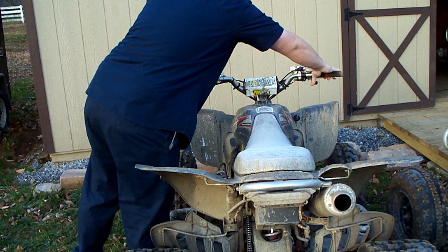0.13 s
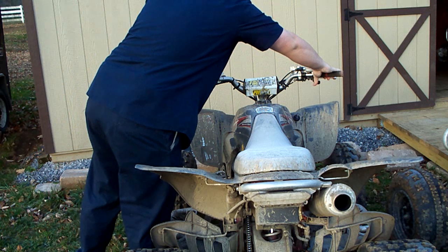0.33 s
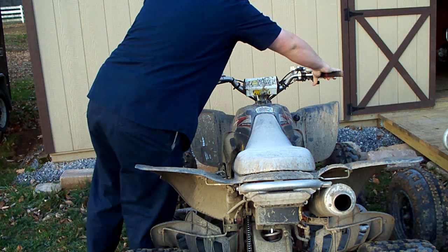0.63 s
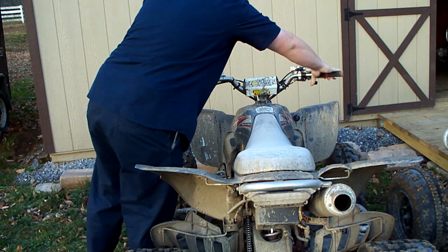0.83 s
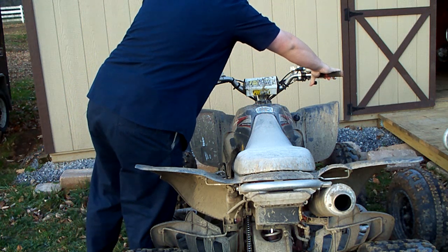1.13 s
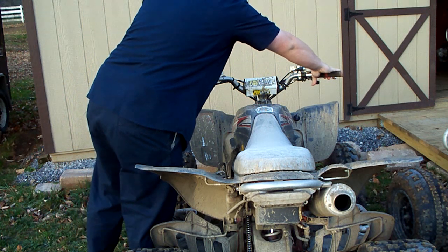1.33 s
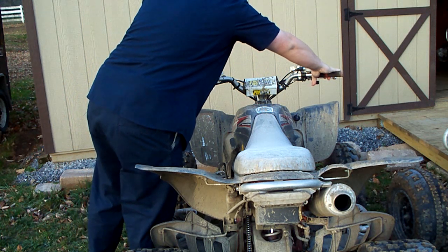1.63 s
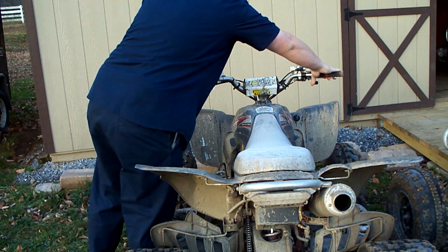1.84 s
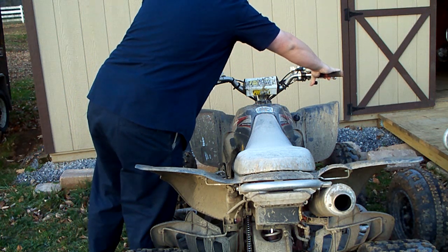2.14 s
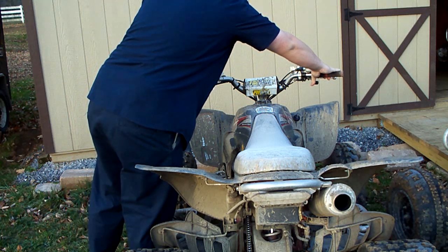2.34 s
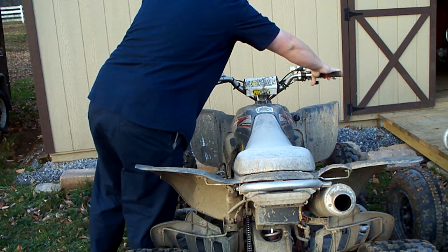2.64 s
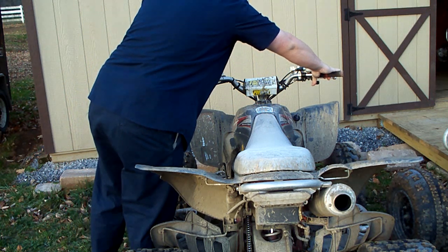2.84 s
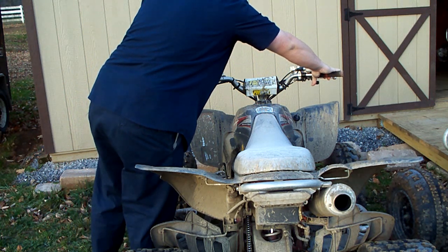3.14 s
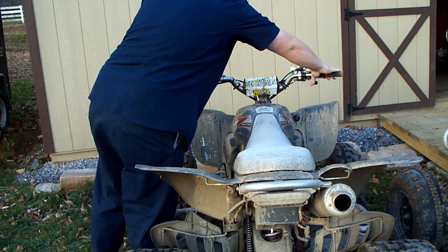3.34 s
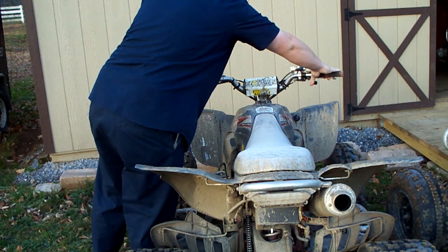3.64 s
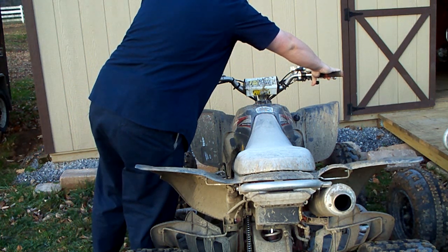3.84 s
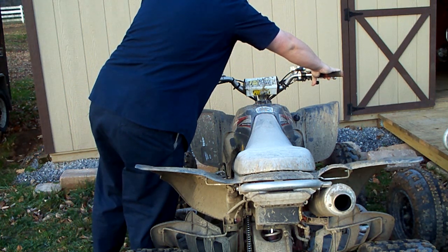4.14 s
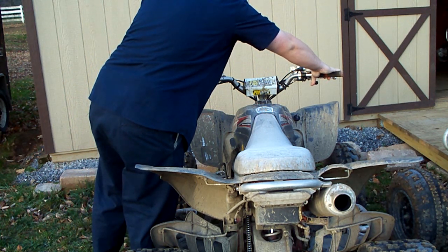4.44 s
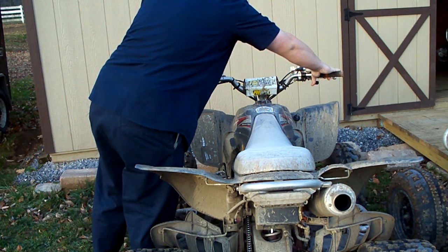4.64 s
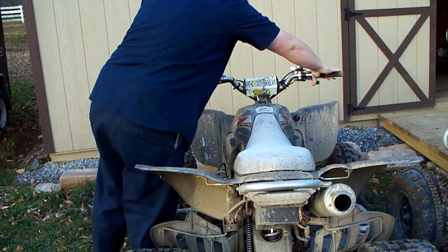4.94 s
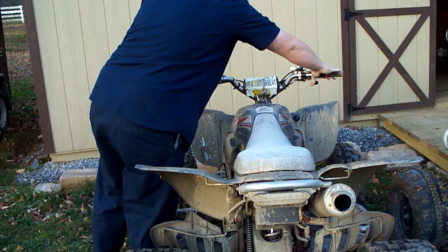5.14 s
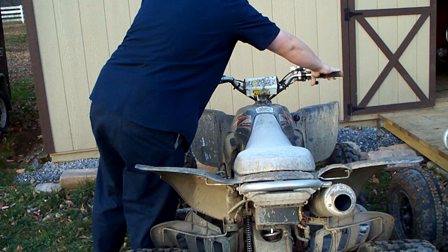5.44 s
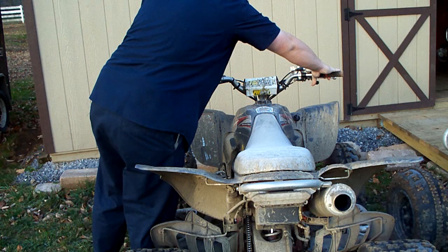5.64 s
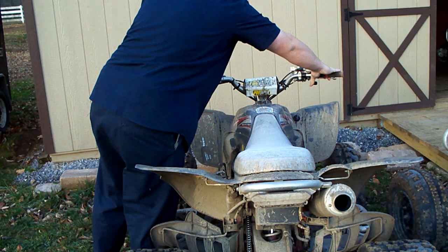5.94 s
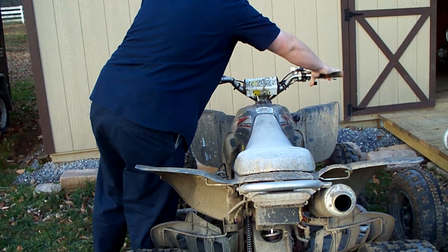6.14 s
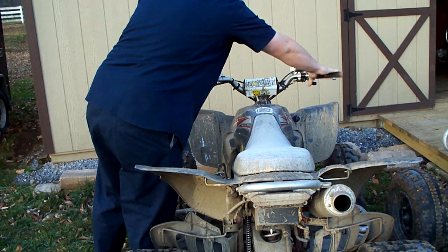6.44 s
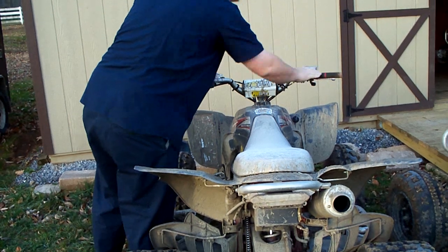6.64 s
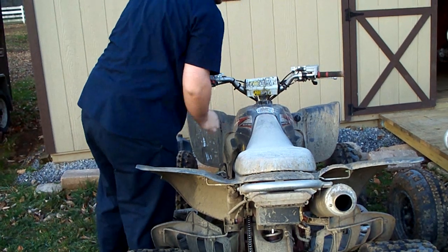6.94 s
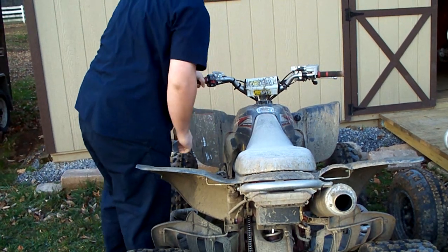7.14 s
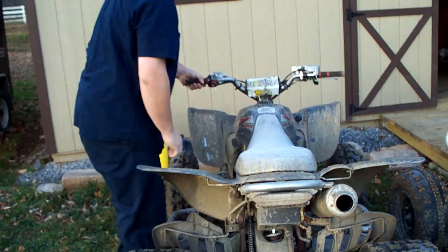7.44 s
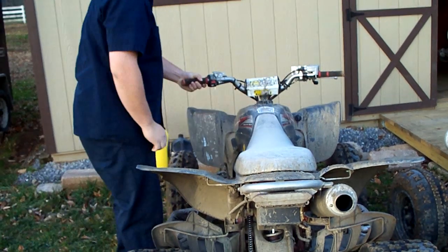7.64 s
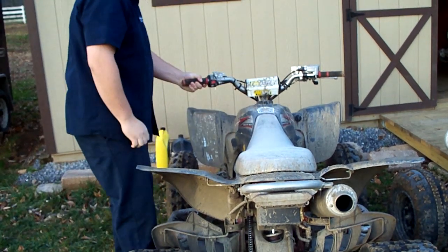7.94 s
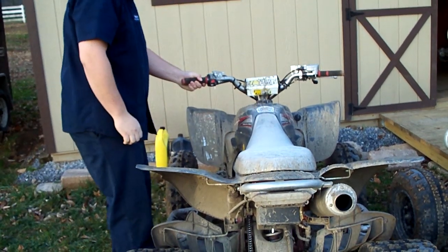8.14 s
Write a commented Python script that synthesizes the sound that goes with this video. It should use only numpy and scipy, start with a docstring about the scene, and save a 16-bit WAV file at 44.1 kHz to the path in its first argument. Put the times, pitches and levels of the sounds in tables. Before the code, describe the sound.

Outdoors, a single-cylinder engine cranks haltingly with gear whine and isolated exhaust thumps, bursts into loud barking bangs, and settles to a fast thudding idle.

```python
"""A single-cylinder quad bike engine, tailpipe to the microphone: stray firings, a two-part backfire, three
hard rasping bangs, then a thudding cold idle of about 17 firings a second; firings ring the pipe modes.
The starter's gear noise and tooth tones whine and rattle in surges and break off at stray firings.
Unfired charges puff and hum; the clutch chirps while starting, the idle's treble swells; chain and valves clatter.
A yard with a wooden shed adds three reflections and a faint scatter to the tailpipe."""
import sys
import numpy as np
from scipy import signal
from scipy.fft import rfft, irfft, next_fast_len
from scipy.io import wavfile
from scipy.ndimage import uniform_filter1d, map_coordinates

SR = 44100
rng = np.random.default_rng(int(sys.argv[2]) if len(sys.argv) > 2 else 0)


def output_pcm(signal):
    """Save a mono or channel-first signal as 16-bit PCM at the path in sys.argv[1].

    Samples are clipped to [-1, 1] before scaling.
    """
    pcm = np.clip(np.atleast_2d(signal).T, -1, 1) * 32767
    wavfile.write(sys.argv[1], SR, np.round(pcm).astype(np.int16))


N = 365588
TIME = np.arange(N) / SR
CUTOFF_HZ = 10000

# Stray firings and bangs of catching: (time [s], level [dB], bark of upper pipe modes [dB])
BANGS = [(0.325, -6.5, -3), (2.312, -2.5, 0.5), (3.552, -9.5, 9), (4.3646, -8.5, -7), (4.737, -4.5, -6),
         (4.8543, -5.5, -4.5), (5.4739, -7, -7), (5.6191, -4.5, -5), (5.7292, -1.5, 6.5), (5.7864, 3.5, 8),
         (5.8246, 2, 6), (5.8596, 3, 8), (5.8946, -3, 1), (5.9322, 1, 5.5), (5.978, -9.5, 3),
         (6.0214, 1, 6), (6.0758, -4.5, -4)]
# Hunting of the cold idle: (time [s], rate [firings/s])
IDLE_SPEED = [(6.169, 17.38), (6.294, 13.98), (6.359, 17.1), (6.78, 16.16), (6.957, 17.76), (7.015, 17.01),
              (7.126, 19.06), (7.184, 15.67), (7.242, 17.87), (7.467, 17.97), (7.526, 15.59), (7.584, 18.3),
              (7.7, 16.46), (7.819, 16.97), (7.88, 16.21), (7.999, 17.32), (8.059, 16.06), (8.12, 16.77)]
IDLE_FROM_S = 6.139
IDLE_DB, IDLE_SPREAD_DB = -1.74, 0.22
IDLE_BARK_DB, BARK_RANGE_DB, BARK_AT_HZ, BARK_SPREAD_DB = 0.8, 3.3, .6, 1.5


def engine_firings():
    """Bangs, then one firing per idle cycle, as (s, dB, bark dB); early burns bark, late ones are dull."""
    running = TIME >= IDLE_FROM_S
    cycles = np.cumsum(in_time(IDLE_SPEED)[running]) / SR
    start_s = np.interp(np.arange(cycles[-1]), cycles, TIME[running])
    rate_hz = 1 / np.diff(start_s, prepend=BANGS[-1][0])
    chance = rng.standard_normal((len(start_s), 2))
    ahead_hz = rate_hz - uniform_filter1d(rate_hz, size=5)
    level_db = IDLE_DB + IDLE_SPREAD_DB * chance[:, 0]
    bark_db = IDLE_BARK_DB + BARK_RANGE_DB * np.tanh(ahead_hz / BARK_AT_HZ) + BARK_SPREAD_DB * chance[:, 1]
    return np.vstack([BANGS, np.transpose([start_s, level_db, bark_db])])


# Modes of the hot exhaust pipe and silencer: (frequency [Hz], signed strength [ratio], t60 [s])
PIPE = [(65.7, 0.0264, 0.17), (131, -0.088, 0.055), (282.2, -0.55, 0.032), (404.5, 0.57, 0.023),
        (760, 0.1, .02), (917, 0.21, 0.016), (1070, 0.19, 0.0073)]


def pipe(start_s, level_db, bark_db, tuning, sustain):
    """Each blow rings all pipe modes; bark raises those above 600 Hz."""
    chance = rng.standard_normal((len(start_s), len(PIPE)))
    out = 0
    for k, (hz, strength, t60_s) in enumerate(PIPE):
        upper = hz > 600
        blow = clicks(start_s, from_db(level_db + upper * bark_db + .5 * chance[:, k]))
        out = out + strength * ring(blow, hz * tuning, t60_s * sustain)
    return out


# Spectrum of the rumble after lone firings: (frequency [Hz], density [dB per Hz])
RUMBLE_COLOUR = [(60, 0.5), (170, -2), (320, 2), (600, -9), (820, -12), (1300, -28), (4000, -39)]


def exhaust(firings):
    """Lone firings meet cold gas, so the pipe rings lower; the slow piston pushes a second puff after."""
    start_s, level_db, bark_db = np.transpose(firings)
    lone = np.diff(start_s, prepend=-1) > .112   # gap [s]
    hot = pipe(start_s[~lone], level_db[~lone], bark_db[~lone], tuning=1, sustain=1)
    cold = pipe(start_s[lone], level_db[lone], bark_db[lone], tuning=0.892, sustain=0.72)
    delay_s = 0.01693 + 0.0013 * rng.standard_normal(lone.sum())
    second = clicks(start_s[lone] + delay_s, from_db(level_db[lone]))
    after = 0.19 * ring(second, hz=272.0, t60_s=0.058)
    after = after - 0.12 * ring(second, hz=435, t60_s=0.026)
    after = after + 0.017 * ring(second, hz=62.4, t60_s=0.6)
    rumble = from_db(-30.5) * fade(second, decay_s=0.069) * noise(RUMBLE_COLOUR) * from_db(3 * drift(70))
    return soften(hot + cold + after, peak_s=0.00059, width_s=0.00022) + rumble


# Spectrum of the trailing gas: (frequency [Hz], density [dB per Hz])
GAS_COLOUR = [(100, -7), (330, 12.5), (560, 7.5), (800, 0), (1300, -2.5), (2000, -4), (3200, -21.5),
              (5000, -17), (7000, -8.5), (9300, -28.5)]


def gas(firings):
    """Turbulent gas: a spit as the valve opens, then a rush that trails each firing."""
    start_s, level_db, bark_db = np.transpose(firings)
    strength = from_db(level_db + 0.44 * bark_db + rng.normal(0, 1, len(start_s)))
    rush_env = fade(clicks(start_s + .004, strength), decay_s=0.019)
    rush = from_db(-28.5) * rush_env * noise(GAS_COLOUR) * from_db(2 * drift(300))
    spit_env = fade(clicks(start_s + 0.00075, strength), decay_s=0.0015)
    return rush + from_db(-29) * spit_env * noise(RATTLE)


# A two-part backfire, then the rasp of the three hard bangs: (time [s], level [dB], length [s])
NOISE_BURSTS = [(3.624, -20, 0.0079), (3.642, -21.5, 0.017), (5.787, -17, 0.0064), (5.825, -14, 0.0076),
                (5.861, -17.5, 0.0047)]
# Spectrum of these bursts: (frequency [Hz], density [dB per Hz])
BURST_COLOUR = [(100, -12), (400, 1), (800, -3.5), (1300, -3.5), (2000, -4), (3200, -15), (5000, -17),
                (7000, -9.5), (9300, -27.5)]


def backfire_and_rasp():
    """Turbulent noise bursts with a ragged level: a two-part backfire, then the rasp of the three hard bangs."""
    ragged = from_db(2 * drift(500))
    return swells(NOISE_BURSTS, attack_s=0.0014, release_s=0.012) * noise(BURST_COLOUR) * ragged


# Unfired charges leaving the pipe: (time [s], relative level [dB])
PUFFS = [(.003, -38.5), (0.536, -42.5), (0.902, -45), (1.263, -42.5), (1.625, -36), (1.989, -36),
         (2.875, -44.5), (3.235, -46), (3.664, -37), (4.05, -48.5), (4.95, -46), (5.179, -54)]
HUM_START_HZ, HUM_RISE_HZ_PER_S, HUM_TOP_HZ = 45.8, 200, 78   # before a slight wander


def puffs():
    """An unfired charge thumps; the pipe hums while the valve is open, climbing as the piston rises."""
    start_s, level_db = np.transpose(PUFFS)
    push = soften(clicks(start_s, from_db(level_db)), peak_s=.002, width_s=0.00023)
    valve_open = swells([(s, db, .11) for s, db in PUFFS], attack_s=.008, release_s=0.017)
    latest = np.maximum(np.searchsorted(start_s, TIME) - 1, 0)
    age_s = np.maximum(TIME - start_s[latest], 0)
    hz = np.minimum(HUM_START_HZ + HUM_RISE_HZ_PER_S * age_s, HUM_TOP_HZ) + 2 * drift(22)
    hum = valve_open * np.sin(2 * np.pi * np.cumsum(hz) / SR)
    return from_db(-7) * hum - from_db(9) * ring(push, hz=104, t60_s=0.077)


# Starter speed between compressions: (time [s], tooth rate [Hz])
MESH = [(0, 1191), (.6, 1201), (2.2, 1199), (2.7, 1199), (3.4, 1205), (4.2, 1224), (4.95, 1247),
        (5.8, 1223)]
# Starter labouring through heavy piston strokes: (time [s], length [s], level [dB])
STROKES = [(0.11, 0.094, -17.5), (0.229, 0.077, -18.5), (0.773, 0.067, -25.5), (1.135, 0.073, -26),
           (1.497, 0.068, -17.5), (1.859, 0.071, -17.5), (2.1, 0.093, -17), (2.23, 0.07, -18.5),
           (2.748, 0.055, -25), (3.104, 0.069, -26), (3.47, 0.074, -17), (3.933, 0.059, -28),
           (4.284, .064, -29), (4.667, 0.066, -27.5), (5.392, 0.063, -27.3)]
SAG_HZ = 180.6   # fall of tooth rate at the top of a stroke


def tooth_rate():
    """The starter races briefly as a heavy stroke begins, sags at its top and recovers."""
    hz = in_time(MESH)
    for start_s, length_s, _ in STROKES:
        top_s = start_s + length_s
        near = np.abs(TIME - top_s) < .2
        age_s = TIME[near] - top_s
        race = 0.36 * np.exp(-.5 * ((age_s + 0.0627) / 0.018) ** 2)
        sag = np.exp(-.5 * (age_s / np.where(age_s < 0, .024, .034)) ** 2)
        hz[near] += SAG_HZ * (race - sag)
    return hz


# Bite, then full push of a stroke: (start [share of stroke], level [dB re stroke], length [share of stroke])
STROKE_SHAPE = [(0, -1, 0.38), (.43, 0.5, 0.44)]
# Slack taken up, gears bouncing: (time [s], length [s], level [dB], rise over length [dB], bounce period [s])
TAKEUPS = [(0, 0.11, -24, 5, .056), (0.452, 0.27, -28, 0.5, .051), (0.861, 0.23, -27.5, 1, .0505),
           (1.222, .24, -28, 7.5, .051), (1.585, 0.23, -22, 4.5, .0505), (1.949, 0.15, -21.5, 0.5, .05),
           (2.428, 0.032, -34.5, 0, .051), (2.554, 0.024, -27.5, 0, .051), (2.619, 0.071, -31.5, 11, .036),
           (2.837, .23, -30.5, 1.7, .023), (3.196, 0.25, -32.5, 10.3, .023), (3.838, 0.032, -32, 0, .051),
           (4.016, 0.21, -33.5, 2.5, .052), (4.473, 0.008, -27.5, 0, .051), (4.831, 0.0088, -38, 0, .051),
           (4.943, 0.093, -39, 3, .023), (5.155, 0.011, -27, 1, .051), (5.221, .1, -35, 11, .023),
           (5.584, 0.009, -25, -3, .051), (5.703, 0.02, -29.5, 0, .051)]
BOUNCE_CONTACT, FIRST_BOUNCE_DB = 0.74, 2.9   # share of a period in contact; extra on first contact


def gear_surges():
    """Gear load as (s, dB, length s): two in each stroke, one per bounce of a take-up."""
    rows = []
    for start_s, length_s, db in STROKES:
        for start, step_db, share in STROKE_SHAPE:
            rows.append((start_s + start * length_s, db + step_db, share * length_s))
    for start_s, length_s, db, rise_db, period_s in TAKEUPS:
        for age_s in np.arange(0, length_s, period_s):
            level_db = db + rise_db * age_s / length_s + FIRST_BOUNCE_DB * (age_s == 0)
            contact_s = min(BOUNCE_CONTACT * period_s, length_s - age_s)
            rows.append((start_s + age_s, level_db, contact_s))
    return rows


def grinding(turns, memory, size=400):
    """Worn teeth repeat much of their roughness each turn: a comb of lines gliding with speed."""
    fresh = rng.standard_normal((N // 200, size))
    surface = signal.lfilter([1], [1, -np.clip(memory, 0, .95)], fresh, axis=0).ravel()
    return map_coordinates(surface, [turns * size], order=3, mode="wrap")


# Gear tones: (multiple of tooth rate, mean relative level [dB])
WHINE = [(.5, -19), (1, -7.5), (2, -11.5), (3, -19.5), (6, -13), (7, -21.5)]
# Spectrum of gear rattle, spits and valve ticks: (frequency [Hz], density [dB per Hz])
RATTLE = [(120, -37.5), (330, -5), (600, -3.5), (850, -4), (1150, -1), (1700, -1), (2300, -1.5),
          (2900, -2.5), (3600, -11.5), (5000, -5.5), (6000, -11), (7000, -4), (8000, -4.5), (9300, -25)]
# Crankcase resonances: (frequency [Hz], width [Hz], mean gain [dB])
CASE = [(1180, 102, 3.5), (1512, 47, 4), (1729, 30, -1), (1922, 41, 3), (2072, 41, 4), (2164, 64, 5.5),
        (2333, 140, 3.5), (2428, 30, 4), (2740, 26, -1.5), (3233, 117, 2.5), (5900, 110, 3),
        (6240, 67, -7.5), (6440, 47, 6), (6890, 31, 10), (7500, 57, -11.5), (7370, 56, 5), (7000, 12, -17),
        (8260, 30, 6.5), (8840, 110, 7.5)]


def starter():
    """Teeth clash once per mesh, harder once per turn of armature and idler, and ring the crankcase."""
    speed_jitter = 1 + .002 * drift(150) + .006 * drift(40)
    teeth = 2 * np.pi * np.cumsum(tooth_rate() * speed_jitter) / SR
    armature, idler = teeth / 9, teeth / 23
    wobble = (1 + 0.057 * np.cos(armature)) * (1 + 0.081 * np.cos(idler)) * from_db(1.62 * drift(400))
    rough = grinding(armature / (2 * np.pi), memory=.55)
    clash = colour(rough * (1 + 0.57 * np.cos(teeth)), RATTLE)
    # wandering contact point: case modes take turns
    case = sum(from_db(db + 3.7 * drift(35)) * resonance(clash, hz, width_hz) for hz, width_hz, db in CASE)
    rattle = rms_one(0.65 * clash + case)
    whine = 0
    for k, db in WHINE:
        level = from_db(db + 4.6 * drift(30))
        whine = whine + level * np.sqrt(2) * np.sin(k * teeth + 0.76 * drift(60))
    # under compression load: more whine, less rattle
    load = bumps([(s + .5 * length_s, .03) for s, length_s, _ in STROKES])
    gears = rattle * from_db(-2.2 * load) + whine * from_db(-7.5 + 5.5 * load)
    # slack idler bounces: bright chinks
    bounce = np.cos(idler + 1.2 * drift(12))
    gears = gears + .45 * bounce * resonance(gears, hz=7500, width_hz=2200)
    surges = gear_surges()
    # each surge peaks near its middle
    crest = bumps([(s + 0.53 * length_s, 0.22 * length_s + .002) for s, _, length_s in surges])
    envelope = from_db(-6.0 + 3.5 * crest) * swells(surges, attack_s=0.0058, release_s=0.013)
    return envelope * wobble * gears


# Clutch chirps while starting, and two faint treble swells in the idle:
# (time [s], level [dB], length [s], frequency [Hz])
TREBLE_BURSTS = [(.385, -46.5, 0.0094, 6500), (2.346, -26, 0.017, 6220), (3.588, -30, 0.015, 6500),
                 (5.751, -31.5, 0.027, 7030), (6.35, -42, .03, 7180), (7.173, -43, 0.036, 6600)]


def chirps_and_treble_swells():
    """Clutch chirps while starting and two faint treble swells in the idle: noise band-passed twice."""
    hiss = rng.standard_normal(N)
    out = 0
    for row in TREBLE_BURSTS:
        band = resonance(resonance(hiss, row[3], 450), row[3], 450)
        out = out + swells([row], attack_s=0.0049, release_s=0.0065) * rms_one(band)
    return out


# Chain and valve gear noise: (time [s], mean level [dB])
CLATTER = [(0, -48.5), (2.3, -36.5), (2.45, -42.5), (2.7, -44.5), (3.7, -44.5), (3.8, -50.5), (4.6, -48.5),
           (4.95, -45), (5.1, -46.5), (5.65, -45), (5.85, -35.5), (6.1, -45.5), (6.6, -47), (8.29, -46.5)]
# Spectrum of that noise: (frequency [Hz], density [dB per Hz])
CLATTER_COLOUR = [(60, -2.5), (150, -8.5), (330, -6), (600, -1), (1100, -1), (2200, -1), (3300, -7),
                  (5000, -14.5), (7000, -6), (9300, -26.5)]


def clatter(firings):
    """The chain makes continuous noise; valves tick at about the same two points of each running cycle."""
    start_s = firings[:, 0]
    cycle_s = np.diff(start_s)
    running = cycle_s < .08
    chance = rng.standard_normal((len(cycle_s), 4))
    valves = 0
    for k, share in enumerate((.73, .79)):
        tick_s = start_s[:-1] + share * cycle_s + .001 * chance[:, k]
        valves = valves + clicks(tick_s, running * from_db(3 * chance[:, k + 2]))
    ticks = from_db(-44) * fade(valves, decay_s=0.0019) * noise(RATTLE)
    return ticks + from_db(in_time(CLATTER) + 2.4 * drift(120)) * noise(CLATTER_COLOUR)


# Reflections from ground, bike and shed: (delay [s], signed strength [ratio])
ECHOES = [(.004, 0.16), (0.0156, -0.088), (0.0203, -.125)]


def yard(x, scatter_db, t60_s):
    """A few clear reflections and a faint dull scatter of decaying noise."""
    age_s = TIME[:SR // 2]
    dull = signal.lfilter([1], [1, -.8], rng.standard_normal(len(age_s)))
    tail = dull * np.exp(-np.log(1000) * age_s / t60_s) * (age_s > .008)
    scatter = signal.oaconvolve(x, tail / np.sqrt(np.sum(tail ** 2)))[:N]
    echoes = sum(strength * delayed(x, delay_s) for delay_s, strength in ECHOES)
    return x + echoes + from_db(scatter_db) * scatter


def from_db(db):
    """Decibels to amplitude ratio."""
    return 10 ** (np.asarray(db) / 20)


def rms_one(x):
    """Scales to rms 1."""
    return x / np.sqrt(np.mean(x ** 2) + 1e-20)


def in_time(rows):
    """A curve joined by straight lines."""
    return np.interp(TIME, *np.transpose(rows))


def drift(knots_per_s):
    """Random wander of rms 1, straight between knots."""
    knots = rng.standard_normal(20000)
    return rms_one(np.interp(TIME * knots_per_s, np.arange(len(knots)), knots))


def colour(x, spectrum):
    """Shapes noise to a spectrum, cut at CUTOFF_HZ; rms 1."""
    size = next_fast_len(N)
    hz = np.maximum(np.arange(size // 2 + 1) * SR / size, 1)
    at_hz, db = np.transpose(spectrum)
    gain = from_db(np.interp(np.log(hz), np.log(at_hz), db))
    gain = gain * np.minimum(hz / at_hz[0], 1) ** 2 * (hz < CUTOFF_HZ)
    return rms_one(irfft(rfft(x, size) * gain, size)[:N])


def noise(spectrum):
    """Steady noise of the given spectrum; rms 1."""
    return colour(rng.standard_normal(N), spectrum)


def clicks(times_s, heights):
    """One impulse per event."""
    out = np.full(N, 1e-18)
    np.add.at(out, np.clip(np.round(times_s * SR).astype(int), 0, N - 1), heights)
    return out


def ring(x, hz, t60_s):
    """A unit click starts a dying sine of initial height 1."""
    r, w = np.exp(-np.log(1000) / (t60_s * SR)), 2 * np.pi * hz / SR
    return signal.lfilter([0, np.sin(w)], [1, -2 * r * np.cos(w), r * r], x)


def resonance(x, hz, width_hz):
    """Two-pole band-pass, peak gain 1."""
    r = np.exp(-np.pi * width_hz / SR)
    top = np.array([1, 0, -1]) * (1 - r * r) / 2
    return signal.lfilter(top, [1, -2 * r * np.cos(2 * np.pi * hz / SR), r * r], x)


def fade(x, decay_s):
    """Each click becomes an exponential decay."""
    return signal.lfilter([1], [1, -np.exp(-1 / (decay_s * SR))], x)


def soften(x, peak_s, width_s):
    """Each click becomes a smooth push of the same area."""
    push = np.exp(-.5 * ((TIME[:SR // 50] - peak_s) / width_s) ** 2)
    return signal.oaconvolve(x, push / push.sum())[:N]


def delayed(x, delay_s):
    """Shifts the sound later."""
    return np.interp(TIME - delay_s, TIME, x, left=0)


def swells(rows, attack_s, release_s):
    """Envelope of events that rise, hold and die away; powers add."""
    power = np.zeros(N)
    for start_s, db, length_s, *_ in rows:
        span = slice(max(int(start_s * SR), 0), int(start_s * SR) + SR // 3)
        age_s = TIME[span] - start_s
        rise = np.clip(age_s / attack_s, 0, 1)
        fall = np.exp(-np.maximum(age_s - length_s, 0) / release_s)
        power[span] += (from_db(db) * rise * fall) ** 2
    return np.sqrt(power)


def bumps(rows):
    """Sum of bells of height 1, one per (s, width s)."""
    out = np.zeros(N)
    for centre_s, width_s in rows:
        centre = int(centre_s * SR)
        span = slice(max(centre - SR // 6, 0), centre + SR // 6)
        out[span] += np.exp(-.5 * ((TIME[span] - centre_s) / width_s) ** 2)
    return out


def scene():
    """Tailpipe in the yard, plus gas and metal noises without reflections."""
    firings = engine_firings()
    tailpipe = yard(exhaust(firings) + puffs(), scatter_db=-23.5, t60_s=0.12)
    gas_noise = gas(firings) + backfire_and_rasp()
    metal = starter() + chirps_and_treble_swells() + clatter(firings)
    return (tailpipe + gas_noise + metal)[None]


def record(dry):
    """Microphone: deep bass dropped, notch near 4 kHz, soft overload on the hardest bangs, top cut."""
    thinned = signal.sosfilt(signal.butter(2, 40, "high", fs=SR, output="sos"), dry)
    coloured = thinned - .95 * resonance(thinned, hz=4200, width_hz=1150)
    limited = coloured / (1 + np.abs(coloured) ** 12) ** (1 / 12)
    return signal.sosfilt(signal.cheby2(12, 60, CUTOFF_HZ * 1.08, fs=SR, output="sos"), limited)


dry = scene()
out = record(dry)
output_pcm(out)
```